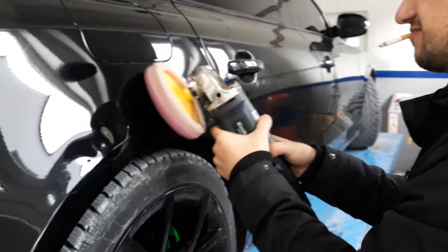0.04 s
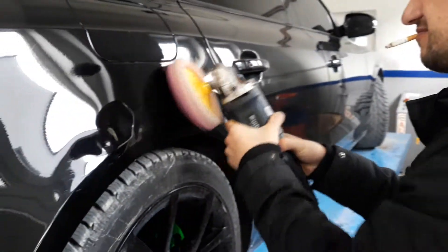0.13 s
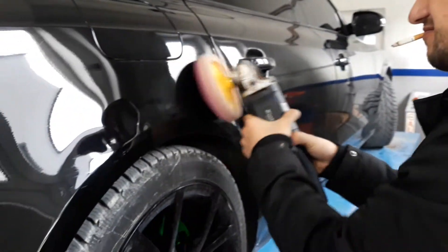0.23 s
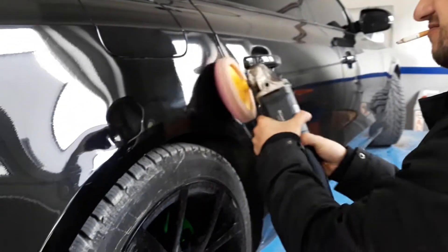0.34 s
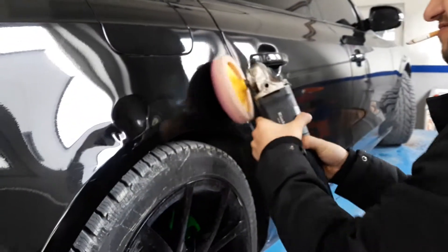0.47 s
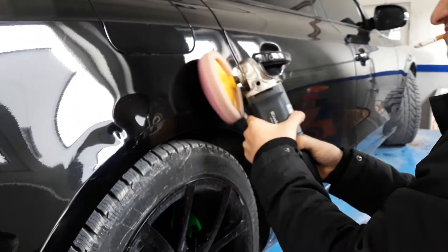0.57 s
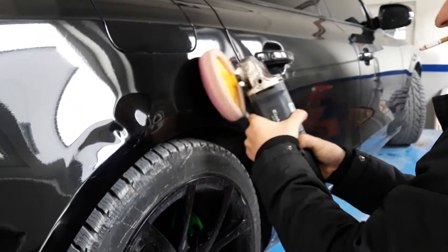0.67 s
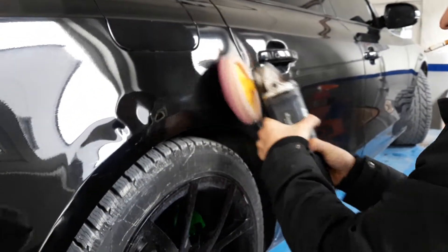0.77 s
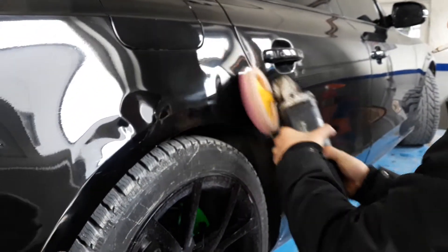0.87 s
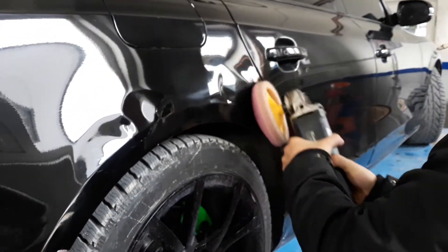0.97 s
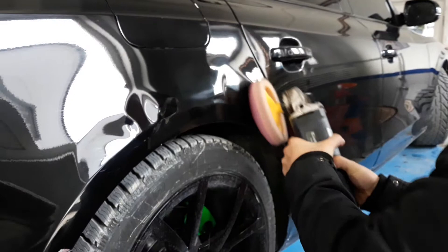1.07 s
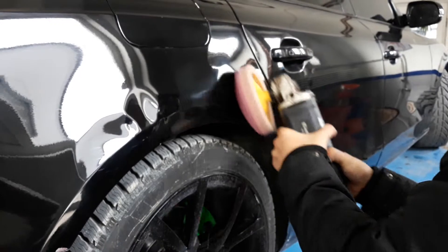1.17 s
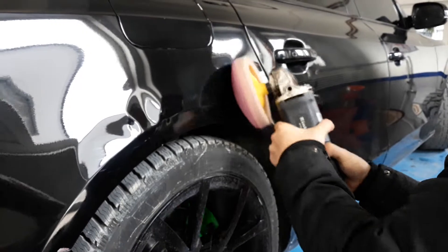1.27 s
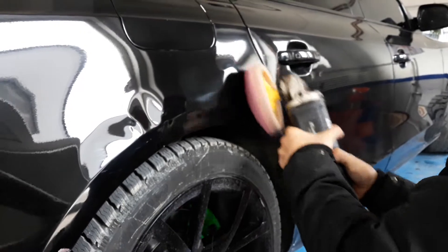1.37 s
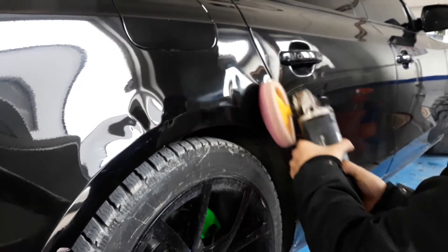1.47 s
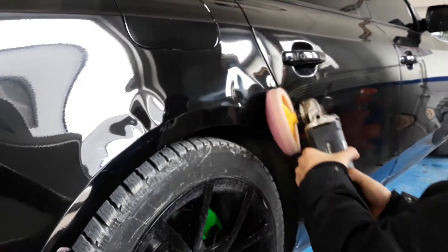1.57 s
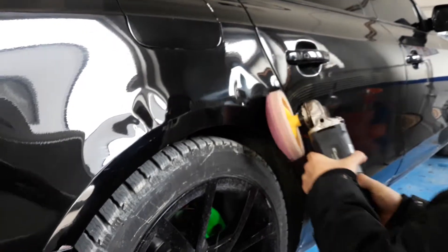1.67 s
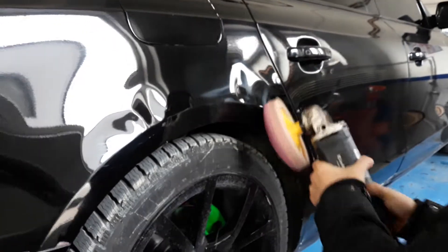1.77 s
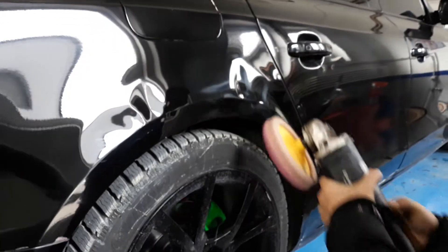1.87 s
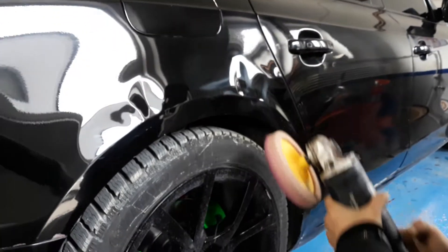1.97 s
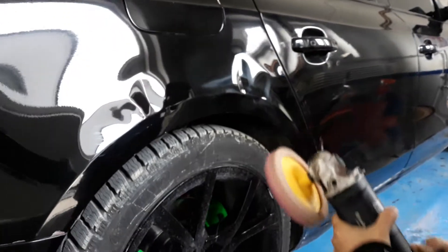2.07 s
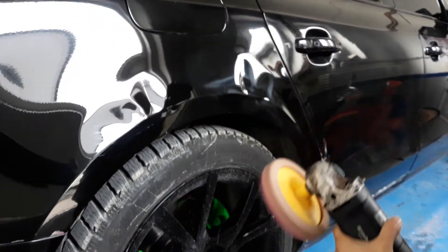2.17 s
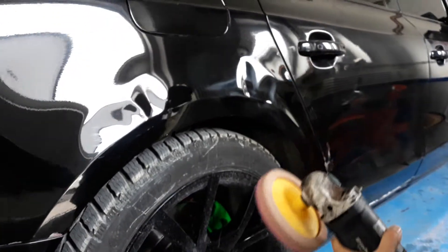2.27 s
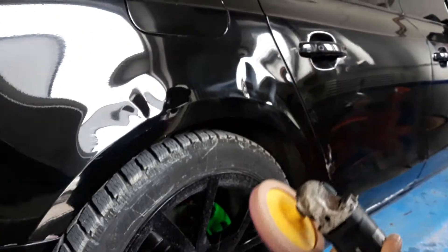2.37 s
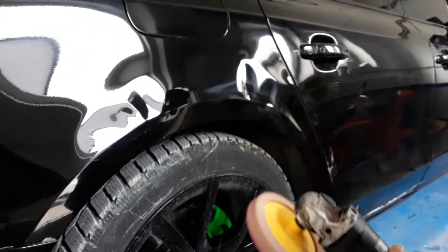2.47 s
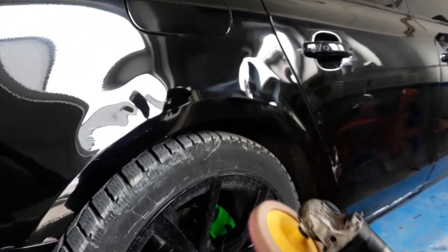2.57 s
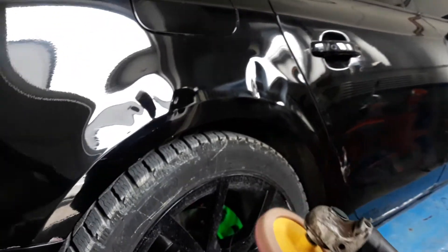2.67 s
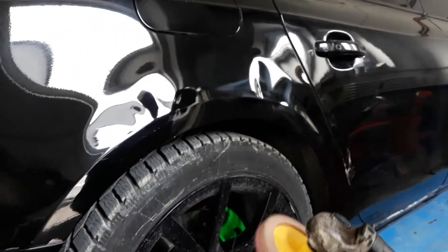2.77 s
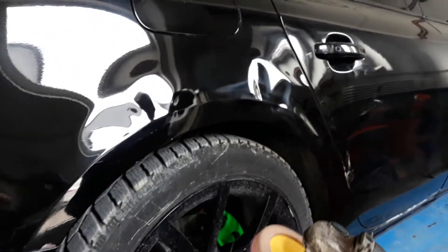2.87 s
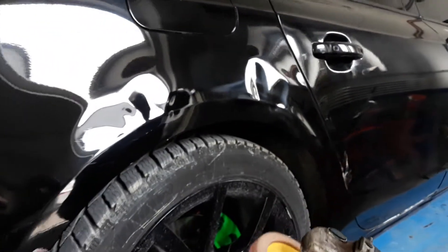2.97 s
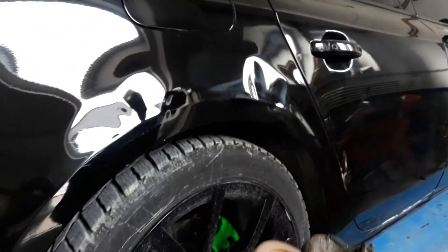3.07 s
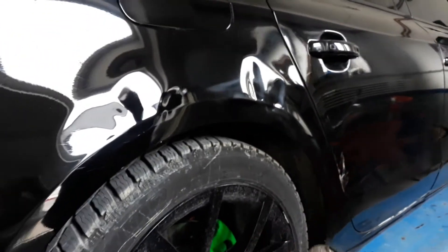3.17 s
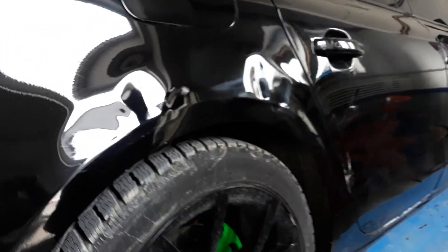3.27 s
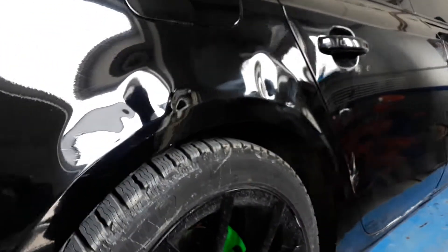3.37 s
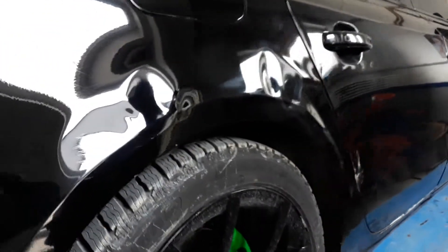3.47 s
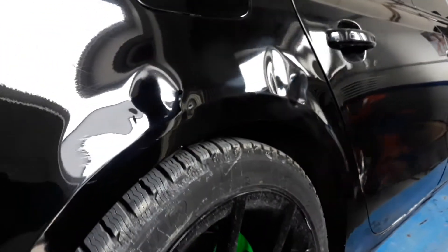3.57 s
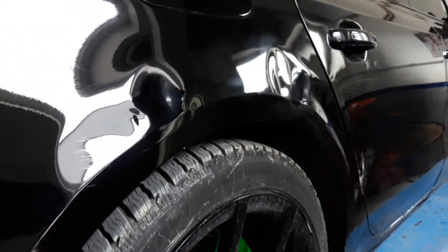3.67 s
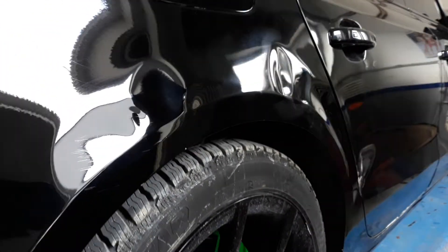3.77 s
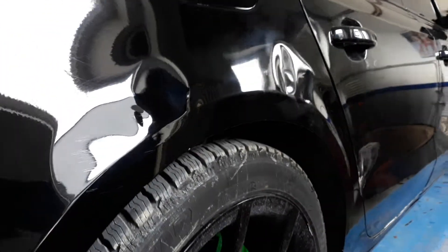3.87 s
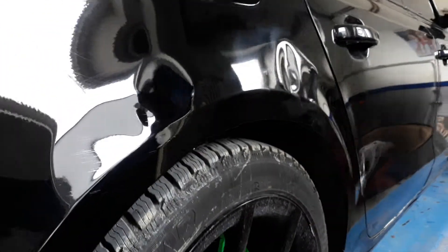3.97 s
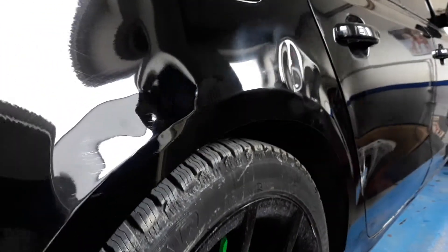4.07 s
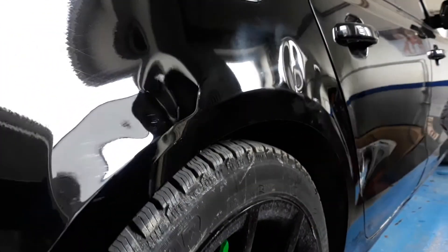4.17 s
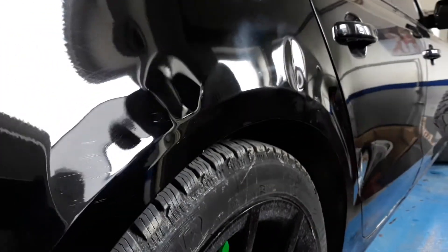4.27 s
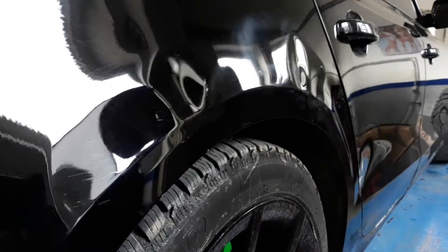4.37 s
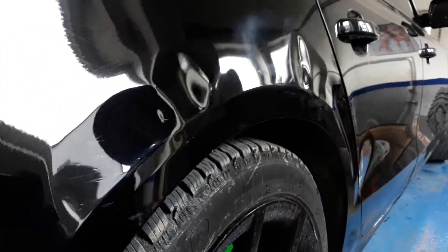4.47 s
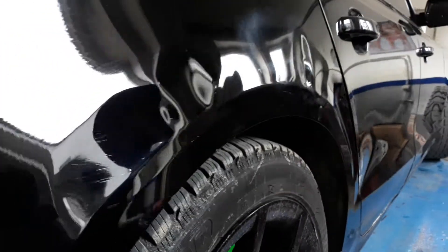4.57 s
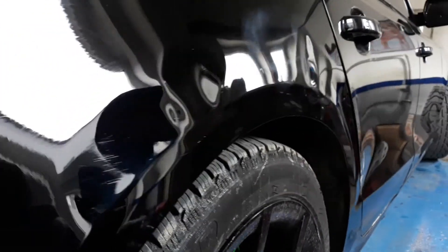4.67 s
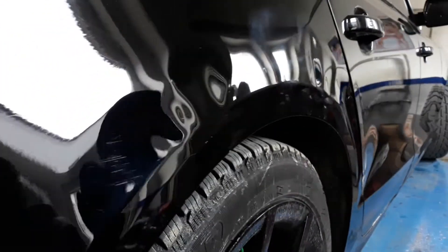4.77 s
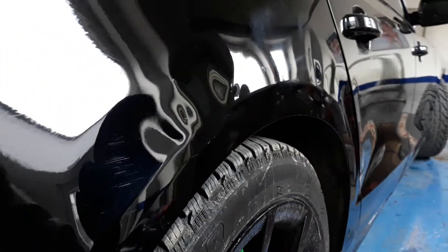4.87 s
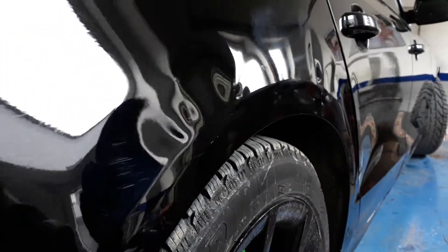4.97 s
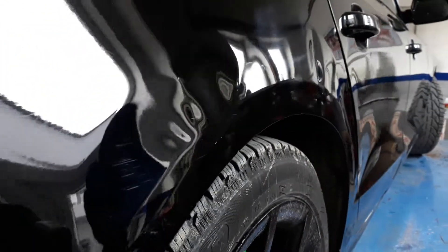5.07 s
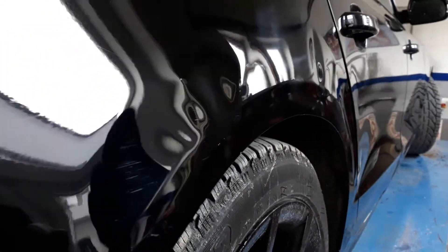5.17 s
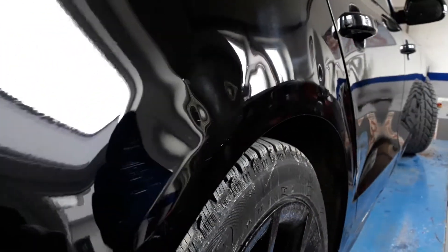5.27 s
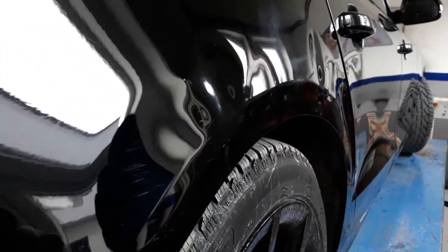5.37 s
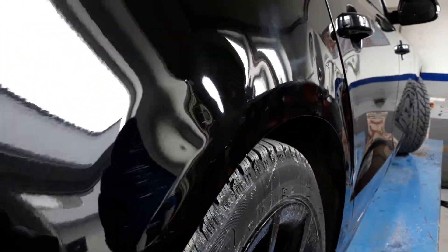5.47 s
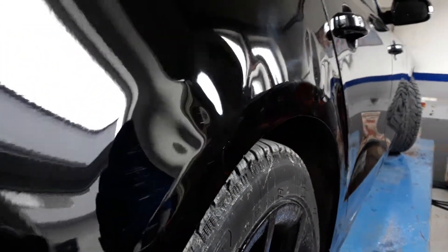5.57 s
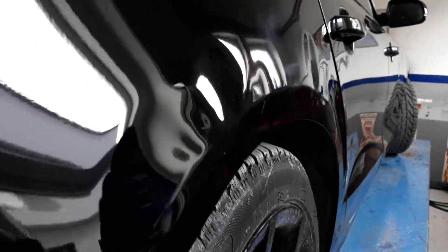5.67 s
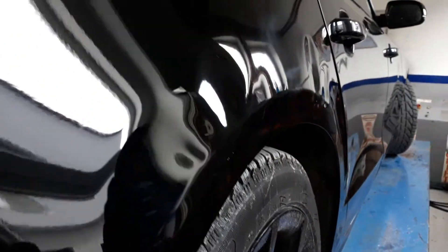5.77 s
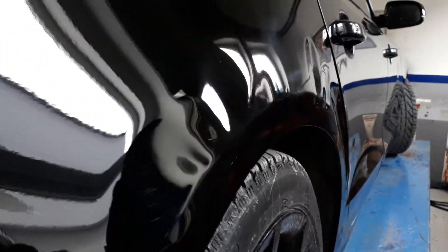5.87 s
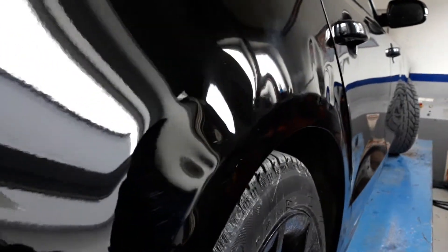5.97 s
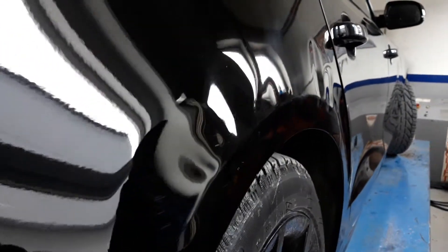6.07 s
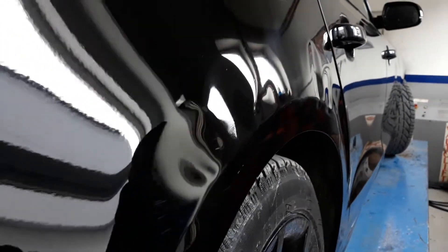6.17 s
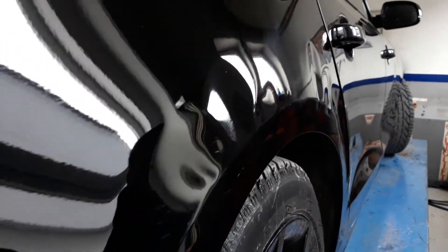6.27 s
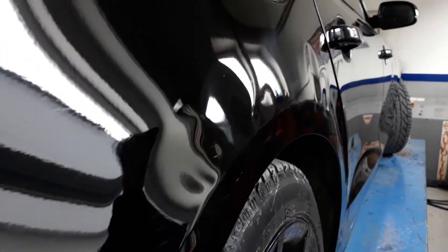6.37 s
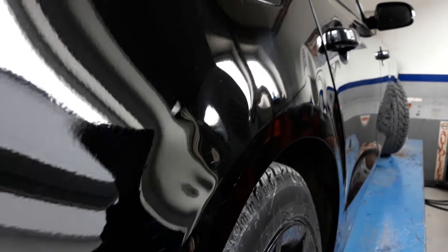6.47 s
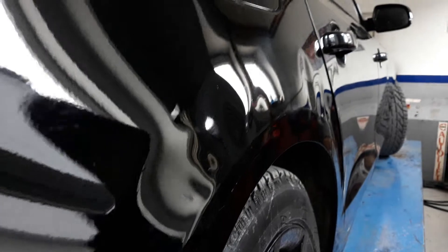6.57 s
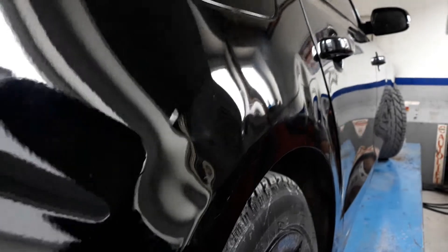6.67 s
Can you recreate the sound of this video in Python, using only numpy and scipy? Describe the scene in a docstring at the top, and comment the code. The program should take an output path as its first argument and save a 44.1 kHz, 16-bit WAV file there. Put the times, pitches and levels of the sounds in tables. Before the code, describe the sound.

From the start, a hand-held electric rotary polisher works close by against a car panel: a high motor whine that wavers in pitch and strength, over a rough gear grind and an airy hiss. At about 1.7 seconds the pad lifts off, the whine rises and holds higher, and scattered metallic clacks begin. At about 2.7 seconds the power goes off. The whine slides steadily down while the loose gears rattle quickly, loudest from 2.8 to 4 seconds, then weakening until the tool fades out at around 5.3 seconds. The faint, steady hum of the workshop is left. A soft low thud swells from 5.5 seconds and ends with a small, sharp click at about 5.9. A light scrape around it turns squeaky near 6.2 seconds and fades by about 6.7. The room adds only a slight echo.

```python
"""Polishing a car wing in a workshop.

A hand-held rotary polisher works on the panel, is lifted off, speeds up and is switched off.
Its twelve-tooth gear whines, the grind of each turn nearly repeats, and brushes and fan hiss.
The unloaded gears rattle as it coasts down. Afterwards the room hum is left, with a low thud,
a click and a squeaky scrape."""
import sys
import numpy as np
from scipy import signal
from scipy.fft import rfft, irfft, next_fast_len
from scipy.io import wavfile
from scipy.ndimage import map_coordinates

SR = 44100
rng = np.random.default_rng(int(sys.argv[2]) if len(sys.argv) > 2 else 0)


def wav_out(sig):
    """Save sig, one row per channel (or a flat mono array), as 16-bit PCM at SR to the path in sys.argv[1]."""
    wavfile.write(sys.argv[1], SR, np.round(np.clip(np.atleast_2d(sig).T, -1, 1) * 32767).astype(np.int16))


N = 296793
TIME = np.arange(N) / SR

TEETH, OFF_S = 12, 2.749   # teeth on the small gear; when the power goes off
LIFT_S = (1.62, 1.78)   # the pad leaves the panel over this span
def polisher():
    """One spinning rotor drives the whine, the grind, the hiss and the rattle."""
    tooth_hz = tooth_rate()
    turns = np.cumsum(tooth_hz / TEETH) / SR
    pressure = np.interp(TIME, LIFT_S, [1, 0])   # 1 on the panel, 0 in the air
    tones = whine(tooth_hz, turns, pressure) * fade(GRIND_LEVEL)
    noise = grind_and_hiss(tooth_hz, turns, pressure)
    return noise + tones + rattle(*gear_knocks(tooth_hz, turns))


# Pushing on the panel: t/s, f/Hz (teeth meeting per second), level/dB (bite: how hard they meet)
PAD_WORK = [(0.0, 1208, -14), (0.14, 1204, -8.5), (0.32, 1237, -3), (0.57, 1257, 0.5), (0.79, 1218, -1),
            (0.92, 1187, -17), (1.08, 1141, -24), (1.13, 1154, -10), (1.24, 1245, -3), (1.28, 1266, -1.5),
            (1.37, 1271, -4.5), (1.44, 1268, -0.5), (1.51, 1269, -10), (1.57, 1261, -13), (1.62, 1313, -4),
            (1.76, 1502, -17)]
FREE_HZ, RUN_UP_S, CREEP_HZ_PER_S = 1659, .126, 122   # in the air: tooth rate, lag, slow extra rise
FRICTION_HZ_PER_S, DRAG_PER_S, CRAWL_HZ = 568, .218, 120   # coasting: two brakes, lowest tooth rate
def tooth_rate():
    """The speed sags under the pad, runs up when lifted, then falls through friction and air drag."""
    lifted_s, lifted_hz = PAD_WORK[-1][:2]
    creep = CREEP_HZ_PER_S * (np.minimum(TIME, OFF_S) - lifted_s)
    free = FREE_HZ + creep - (FREE_HZ - lifted_hz) * np.exp(-(TIME - lifted_s) / RUN_UP_S)
    friction_hz = FRICTION_HZ_PER_S / DRAG_PER_S
    coast = (free + friction_hz) * np.exp(-DRAG_PER_S * np.maximum(TIME - OFF_S, 0)) - friction_hz
    return np.where(TIME < lifted_s, curves(PAD_WORK)[0], np.maximum(coast, CRAWL_HZ))


def octaves_lost(tooth_hz, below_hz):
    """How many octaves the coasting gear has sunk below a given rate."""
    return np.where(TIME > OFF_S, np.maximum(np.log2(below_hz / tooth_hz), 0), 0)


# Rotor tones (every 12th is the teeth): multiple of the turning rate, level/dB pressed, level/dB lifted
ROTOR_TONES = [(1, -50, -48), (5, -41, -60), (6, -40, -55), (10, -37, -44), (12, -37, -34), (15, -35, -43),
               (16, -35, -42), (17, -33, -45), (18, -43, -37), (19, -39, -37), (23, -33, -42),
               (24, -42, -32), (26, -28, -44), (27, -25, -43), (35, -31, -50), (36, -26, -33),
               (41, -37, -46), (48, -38, -38), (52, -47, -46), (60, -40, -38), (72, -38, -40),
               (84, -42, -42), (96, -41, -42), (108, -38, -43), (120, -42, -44), (132, -42, -46),
               (144, -48, -47), (156, -50, -48)]
# How well the housing lets a tone out: f/Hz, level/dB
HOUSING_RESPONSE = [(105, -22), (130, 0), (200, 0), (600, -7), (900, -10), (1150, -3), (1500, 0), (2550, 0),
                    (2760, -2), (2920, -6), (3400, -5), (4100, 2), (5100, 2), (5900, -1), (6600, -6),
                    (7500, -7), (8150, -2), (8430, 11), (8700, -1), (9600, -5), (11200, -5), (12500, -13),
                    (16000, -20), (24000, -80)]
PANEL_HZ, PANEL_WIDTH_HZ, PANEL_DB = 2760, 130, 8   # resonance while the pad is on the panel
def whine(tooth_hz, turns, pressure):
    """Pure tones follow the rotor; each swells as it passes a pitch where the housing rings."""
    bite_db = pressure * curves(PAD_WORK)[1]
    bite_db += 1.2 * (TIME > OFF_S)   # coasting teeth meet louder on their back faces
    bite_db -= 16 * octaves_lost(tooth_hz, below_hz=1250)   # and lose their bite as they slow
    wavers = [0.86 * drift(10.6) + 0.82 * drift(53) for _ in range(6)]
    shaken_turns = turns + .0018 * drift(20)   # a twisting shake blurs the high tones most
    out = np.zeros(N)
    for k, (multiple, pressed_db, lifted_db) in enumerate(ROTOR_TONES):
        hz = multiple * tooth_hz / TEETH
        db = pressure * pressed_db + (1 - pressure) * lifted_db + level_at(HOUSING_RESPONSE, hz)
        db += pressure * PANEL_DB * np.exp(-((hz - PANEL_HZ) / PANEL_WIDTH_HZ) ** 2)
        db += bite_db * (1 if 20 < multiple < 80 else 1 - pressure)   # pressed: middle tones only
        db += 2.5 * wavers[k % 6]
        phase = 2 * np.pi * (multiple * shaken_turns + rng.random()) + .6 * wavers[(k + 3) % 6]
        out += np.sqrt(2) * amp(db) * np.sin(phase)
    return out


# How loud the gears grind: t/s, level/dB
GRIND_LEVEL = [(0.0, -19.5), (0.22, -19), (0.41, -18.5), (0.65, -18.5), (0.84, -20), (1.14, -19.5),
               (1.34, -18), (1.55, -17.5), (1.8, -22.5), (1.96, -23.5), (2.55, -21.5), (3.13, -21.5),
               (4.03, -30.5), (4.31, -31.5), (4.46, -31.5), (4.74, -38), (5.11, -48.5), (5.3, -54)]
# Tone colour of the housing with the pad on the panel: f/Hz, level/dB
PRESSED_COLOUR = [(90, -45), (150, -21), (285, -13), (400, -21), (510, -13), (770, -18), (960, -12),
                  (1170, -18), (1550, -5), (2400, -4), (2750, 2), (3050, -5), (3750, -3), (4400, -7),
                  (5500, -19), (7000, -28), (9100, -40), (15400, -120)]
# Tone colour of the housing in the air: f/Hz, level/dB
LIFTED_COLOUR = [(88, -44), (150, -5.5), (272, -12.5), (627, 3), (786, 0), (938, 1), (1100, -0.5),
                 (2270, 6), (2800, 5), (3860, 7), (4760, 1.5), (5160, -1.5), (5590, -7.5), (7000, -10.5),
                 (9100, -30.5), (15400, -120)]
# How loud the motor brushes and fan hiss, before slowing fades them: t/s, level/dB
HISS_LEVEL = [(0.0, -33.5), (0.52, -32.5), (0.9, -37), (1.06, -35.5), (2.12, -34), (2.46, -31)]
# Tone colour of that hiss: f/Hz, level/dB
HISS_COLOUR = [(2650, -65), (4500, -45), (5500, -7), (6500, -12.5), (7500, -3.5), (8450, 4.5), (9000, 1),
               (9500, -6.5), (11000, -3.5), (12600, -7), (14500, -6.5), (15700, -2.5)]
def grind_and_hiss(tooth_hz, turns, pressure):
    """Rough contacts, partly the same each turn, are heard through the housing and the vents."""
    pattern, fresh = turn_pattern(turns, memory=.9), rng.standard_normal(N)
    brush_repeat = .44 * tooth_hz / 1000   # the share that repeats grows with speed
    gear_repeat = .72 * brush_repeat
    uneven_contact = amp(drift(41))
    gears = uneven_contact * (np.sqrt(gear_repeat) * pattern + np.sqrt(1 - gear_repeat) * fresh)
    brushes = np.sqrt(brush_repeat) * pattern + np.sqrt(1 - brush_repeat) * fresh
    pressed = np.sqrt(pressure) * colour(gears, PRESSED_COLOUR)
    lifted = np.sqrt(1 - pressure) * colour(gears, LIFTED_COLOUR)
    grind = amp(curves(GRIND_LEVEL)[0]) * (pressed + lifted)
    hiss_db = curves(HISS_LEVEL)[0] + 5 - 10.5 * octaves_lost(tooth_hz, below_hz=1400)
    hiss = amp(hiss_db) * colour(brushes, HISS_COLOUR)
    return (grind + hiss) * fade(GRIND_LEVEL, ramp_s=0.58)


def turn_pattern(turns, memory, points=512):
    """Roughness laid around the rotor: each turn keeps most of the last, so the noise has a pitch."""
    fresh = rng.standard_normal((1000, points))   # one row per turn
    kept = signal.lfilter([1], [1, -memory], fresh, axis=0)[100:].ravel()
    return unit_rms(map_coordinates(kept, [turns * points], order=3, mode="wrap"))


# Loud blows as the loose gear teeth slap together: t/s, level/dB
GEAR_BLOWS = [(1.7606, -14.5), (1.8148, -27), (1.9045, -18), (1.9539, -20), (2.0665, -23), (2.147, -14.5),
              (2.2468, -16), (2.4237, -19.5), (2.465, -14.5), (2.537, -26), (2.554, -16), (2.6395, -12),
              (2.741, -17), (2.778, -8.5), (2.8422, -5.5), (2.8998, -4.5), (2.963, -10.5), (2.9704, -6),
              (3.0186, -8.5), (3.0525, -13.5), (3.0953, -4.5), (3.1518, -12), (3.1851, -9.5),
              (3.2235, -8.5), (3.26, -13.5), (3.2991, -9.5), (3.315, -10), (3.3318, -8.5), (3.373, -6.5),
              (3.402, -4), (3.4121, -14), (3.4546, -10), (3.4831, -3.5), (3.5274, -11), (3.549, -9),
              (3.6182, -12.5), (3.644, -8), (3.677, -7.5), (3.7139, -10), (3.743, -12), (3.768, -10.5),
              (3.794, -9), (3.8486, -6), (3.8937, -7), (3.953, -9.5), (4.0165, -11), (4.104, -12.5),
              (4.1205, -11), (4.1397, -10.5), (4.1597, -9.5), (4.1909, -16), (4.199, -13.5), (4.2284, -17),
              (4.2408, -12), (4.2856, -24.5), (4.334, -17.5), (4.357, -16.5), (4.478, -25), (4.503, -22),
              (4.552, -18), (4.5757, -24), (4.6008, -20), (4.626, -23)]
KNOCK_S, KNOCK_HZ = 3.892, 753.4   # time of one knock; tooth rate where knocks are hardest
def gear_knocks(tooth_hz, turns):
    """Times and levels of all blows: the loud ones, plus a knock on each coasting turn that is not near a loud
    one."""
    loud_s, loud_db = np.transpose(GEAR_BLOWS)
    whole_turns = np.floor(turns - turns[int(KNOCK_S * SR)])
    at = np.flatnonzero(np.diff(whole_turns))
    at = at[(at > OFF_S * SR) & (tooth_hz[at] > CRAWL_HZ)]
    scatter = rng.standard_normal((len(at), 2))
    knock_db = -15 - 20.5 * np.log2(tooth_hz[at] / KNOCK_HZ) ** 2 + 2 * scatter[:, 0]
    knock_s = at / SR + .0012 * scatter[:, 1]
    turns_from_loud = np.abs(turns[at, None] - turns[(loud_s * SR).astype(int)]).min(axis=1)
    clear = turns_from_loud > .5
    return np.r_[loud_s, knock_s[clear]], np.r_[loud_db, knock_db[clear]]


# Notes the gear case rings at: f/Hz, level/dB, t/s to die away by 60 dB
CASE_NOTES = [(961, -8, 0.015), (1466, -9, 0.02), (1786, -2, 0.01), (2240, 3.5, 0.01), (2710, -4.5, 0.017),
              (3140, 0.5, 0.017), (3480, 9, 0.0037), (3920, -3, 0.018), (4090, -1, 0.0076),
              (5140, -20, 0.0077), (7000, -38, .008), (8160, -31, 0.017)]
def rattle(times, levels_db, smear_s=.0038):
    """Each blow is a burst of tooth contacts ringing the case; slower blows have weaker low notes."""
    tilt_db_per_octave = np.interp(times, [2.5, 3.3, 4.0], [-4.0, -1.5, 9.0])
    at = (times * SR).astype(int)
    scatter_db = rng.normal(0, 1.5, (len(at), len(CASE_NOTES)))
    burst = signal.windows.hann(int(2 * smear_s * SR))
    out = np.zeros(N)
    for k, (hz, db, t60) in enumerate(CASE_NOTES):
        tilt_db = tilt_db_per_octave * np.log2(min(hz / 3100, 1))
        blows = np.zeros(N)
        blows[at] = amp(levels_db + db - 25.5 + tilt_db + scatter_db[:, k])
        # Contacts are partly rough, partly in step with the note.
        contacts = .6 * rng.choice([-1, 1], N) + .14 * np.sin(2 * np.pi * hz * TIME)
        out += ring(signal.oaconvolve(blows, burst, "same") * contacts, hz, t60)
    crack = np.zeros(N)   # the hardest single contact, mid-blow
    crack[at] = amp(levels_db + 8 + rng.normal(0, 2.3, len(at))) * rng.choice([-1, 1], len(at))
    out += keep_band(crack, (1800, 4800))
    return keep_band(out, 650, "high", order=4)   # keep the blows above 650 Hz


# How the scrape goes: t/s, level/dB of rubbing, level/dB of squeak
SCRAPE_LEVELS = [(5.6, -54, -64), (5.854, -44.5, -60), (5.916, -37, -55), (5.926, -43, -51),
                 (5.976, -47.5, -51), (6.028, -37, -56), (6.194, -36, -34.5), (6.656, -60, -48),
                 (6.73, -68, -59)]
# Tone colour of the rubbing: f/Hz, level/dB
RUB_COLOUR = [(240, -43), (400, -23), (569, -16), (674, -3), (786, -5), (1140, -4), (1300, -2.5),
              (2130, -5), (2600, -13.5), (3300, -5), (3800, -9.5), (15700, -29)]
# Tones in the squeak: multiple of its pitch, level/dB
SQUEAK_TONES = [(1, -18), (2, -6), (3, -15), (4, -11), (5, -16), (6, -18)]
def scrape(squeak_hz=1060):
    """Grainy rubbing; sticking and slipping at a nearly steady rate adds a squeak."""
    rub_db, squeak_db = curves(SCRAPE_LEVELS)
    grains = rng.standard_normal(N) * amp(1.2 * drift(60))
    rub = colour(unit_rms(grains), RUB_COLOUR)
    phase = 2 * np.pi * np.cumsum(squeak_hz * (1 + 0.022 * drift(90))) / SR
    squeak = sum(amp(db + 3.9 * drift(41)) * np.sin(k * phase) for k, db in SQUEAK_TONES)
    return (amp(rub_db) * rub + amp(squeak_db) * squeak) * fade(SCRAPE_LEVELS)


# The tap that makes the click: t/s, level/dB
CLICK_TAPS = [(5.9147, -12.5)]
# Notes the tap sets ringing: f/Hz, level/dB, t/s to die away by 60 dB
CLICK_NOTES = [(1220, -8, 0.016), (4060, -3, .008), (8060, 2.5, 0.0051), (13000, -6, .004)]
def click():
    """A small hard tick: one tap rings a few very short notes."""
    tap = np.zeros(N)
    for s, db in CLICK_TAPS:
        tap[round(s * SR)] = amp(db - 12.5)
    return sum(amp(db) * ring(tap, hz, t60) for hz, db, t60 in CLICK_NOTES)


# How loud the thud is: t/s, level/dB
THUD_LEVEL = [(5.5, -55), (5.856, -42.5), (5.904, -44), (5.92, -59), (5.95, -46)]
def thud():
    """A low rumble close by swells and stops."""
    rumble = unit_rms(keep_band(rng.standard_normal(N), (80, 190)))
    return amp(curves(THUD_LEVEL)[0]) * fade(THUD_LEVEL) * rumble


def echo(x, t60=1):
    """The room answers after a short gap with a dull, dying wash of noise."""
    t = np.arange(int(t60 * SR)) / SR
    tail = rng.standard_normal(len(t)) * amp(-60 * t / t60) * (t > .012)
    tail = signal.lfilter([1], [1, -.5], tail)   # soften the treble
    return signal.oaconvolve(x, tail / np.sqrt(np.sum(tail ** 2)))[:N]


# Tone colour of the workshop noise: f/Hz, level/dB
ROOM_COLOUR = [(20, -45), (35, -24), (48, -19), (75, -11), (110, -10), (300, -8), (450, -12), (900, -8),
               (1200, -11), (2000, -13), (2800, -20.5), (6500, -25.5), (8400, -21.5), (9600, -33.5),
               (15700, -33)]
# Hum of distant machines: f/Hz, level/dB
MACHINE_HUM = [(46, -60), (113, -53.5), (177, -59), (300, -59.5)]
def workshop():
    """Steady room noise with the wavering hum of distant machines."""
    hum = np.zeros(N)
    for hz, db in MACHINE_HUM:
        hum += amp(db + 1 + 2.8 * drift(1.8)) * np.sin(2 * np.pi * hz * TIME + 2.4 * drift(1))
    return amp(-42) * colour(rng.standard_normal(N), ROOM_COLOUR) + hum


def amp(db):
    """Turn decibels into a number to multiply by."""
    return 10 ** (np.asarray(db) / 20)


def unit_rms(x):
    """Scale a signal so its average strength (rms) is 1."""
    return x / np.sqrt(np.mean(x ** 2) + 1e-20)


def curves(rows):
    """Join a table's timed points with straight lines, one curve per value column."""
    times, *columns = np.transpose(rows)
    return [np.interp(TIME, times, column) for column in columns]


def fade(rows, ramp_s=0.058):
    """Fade in before a table's first time and out after its last."""
    start, end = rows[0][0], rows[-1][0]
    return np.interp(TIME, [start - ramp_s, start, end, end + ramp_s], [0, 1, 1, 0])


def level_at(spectrum, hz):
    """Look up the level at a frequency, with octaves evenly spaced."""
    points_hz, points_db = np.transpose(spectrum)
    return np.interp(np.log(hz + 1), np.log(points_hz), points_db)


def colour(x, spectrum):
    """Give white noise a tone colour without changing its strength."""
    size = next_fast_len(N)
    gains = unit_rms(amp(level_at(spectrum, np.fft.rfftfreq(size, 1 / SR))))
    return irfft(rfft(x, size) * gains, size)[:N]


def keep_band(x, hz, kind="band", order=2):
    """Let through a range of frequencies, or with "high" those above one."""
    return signal.sosfilt(signal.butter(order, hz, kind, fs=SR, output="sos"), x)


def drift(hz, step=40):
    """A smooth random wander of size about 1; a higher hz wanders faster."""
    r = np.exp(-2 * np.pi * hz * step / SR)
    noise = rng.standard_normal(N // step + 2002)
    slow = signal.lfilter([1], [1, -2 * r, r * r], noise)[2000:]   # skip while the filter settles
    return np.interp(np.arange(N) / step, np.arange(len(slow)), unit_rms(slow))


def ring(taps, hz, t60):
    """Each tap starts a pure tone that dies away by 60 dB in t60 seconds."""
    r, angle = amp(-60 / (t60 * SR)), 2 * np.pi * hz / SR
    return signal.lfilter([0, np.sin(angle)], [1, -2 * r * np.cos(angle), r * r], taps + 1e-18)


def scene():
    """Polisher, scrape and click with their echo, over the thud and the room, in one channel."""
    near = polisher() + scrape() + click()
    return (near + amp(-30.5) * echo(near) + thud() + workshop())[None]


def record(dry, cutoff_hz=15720):
    """Round off the loudest peaks and cut the highest treble."""
    rounded = .9 * np.tanh(dry / .9)
    return signal.sosfilt(signal.ellip(12, .5, 80, cutoff_hz, fs=SR, output="sos"), rounded)


dry = scene()
out = record(dry)
wav_out(out)
```